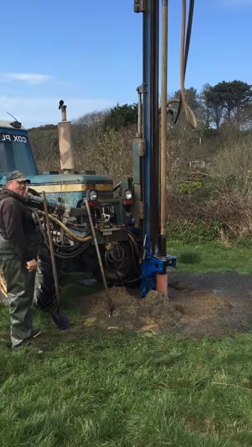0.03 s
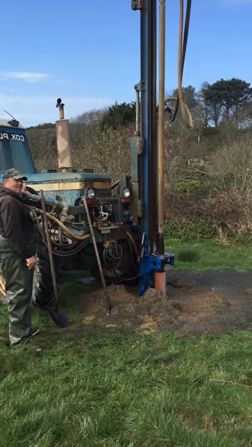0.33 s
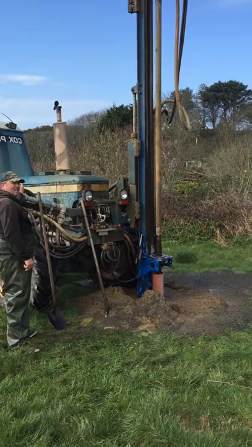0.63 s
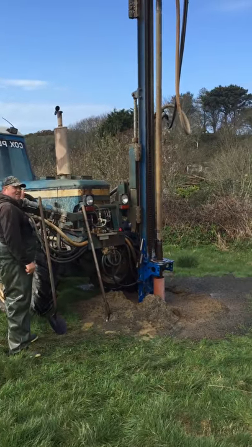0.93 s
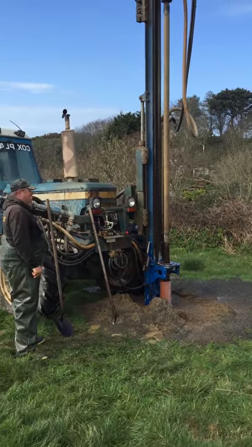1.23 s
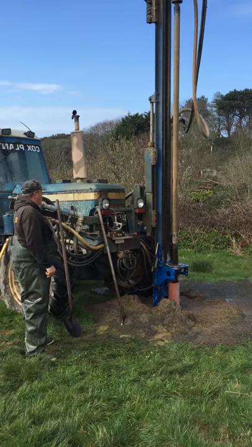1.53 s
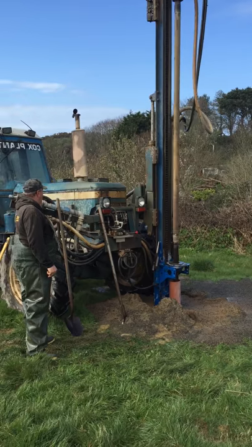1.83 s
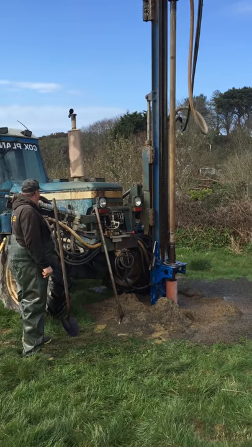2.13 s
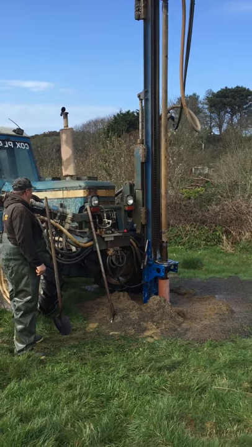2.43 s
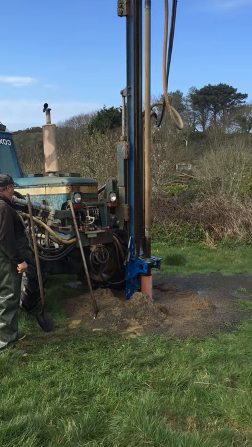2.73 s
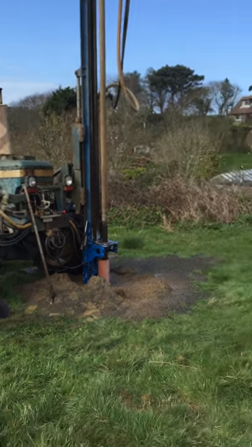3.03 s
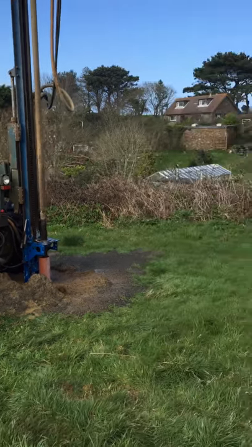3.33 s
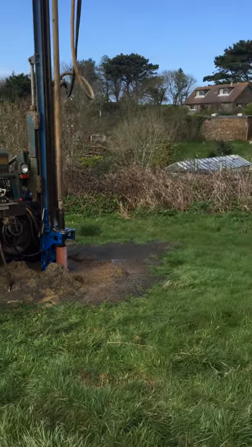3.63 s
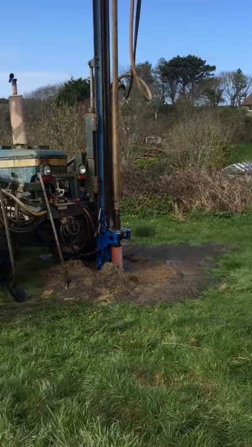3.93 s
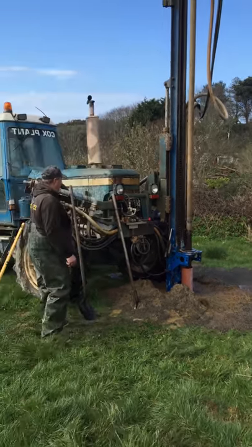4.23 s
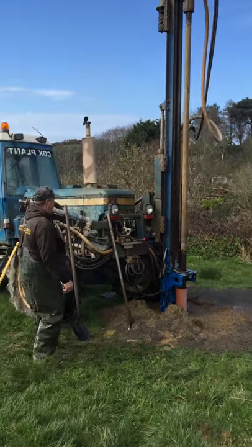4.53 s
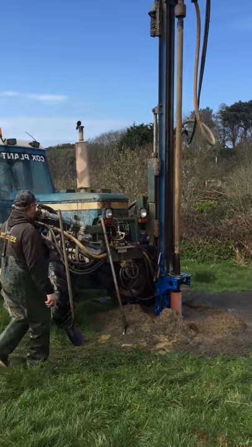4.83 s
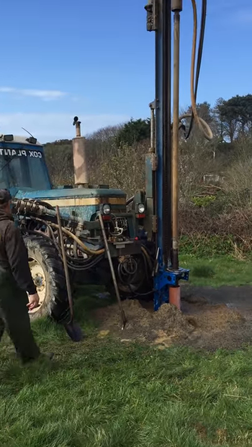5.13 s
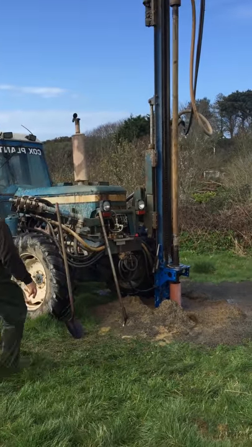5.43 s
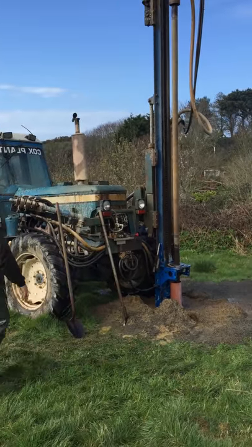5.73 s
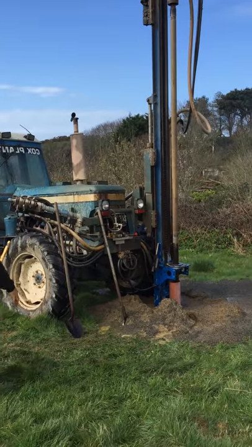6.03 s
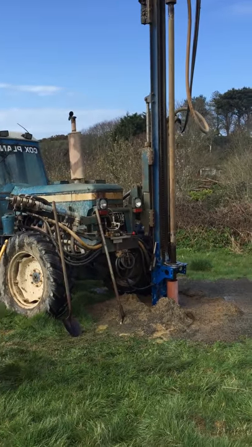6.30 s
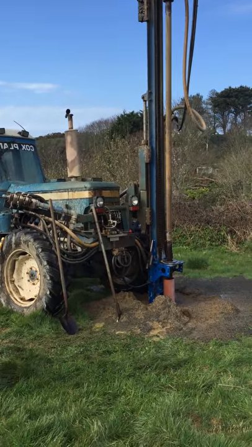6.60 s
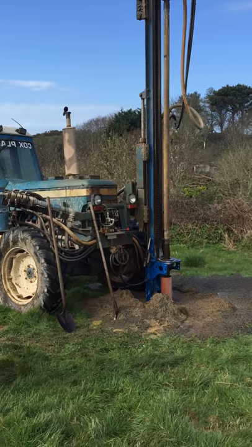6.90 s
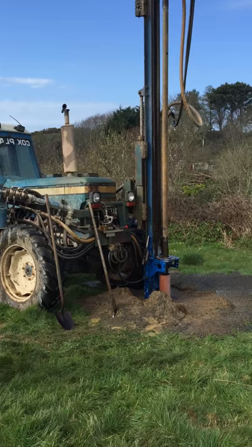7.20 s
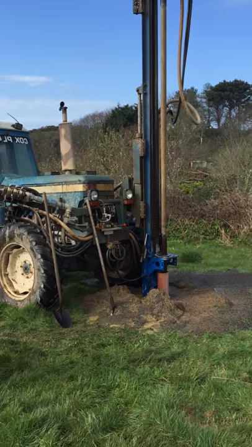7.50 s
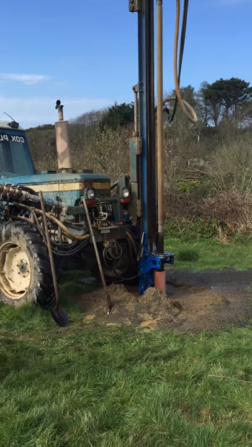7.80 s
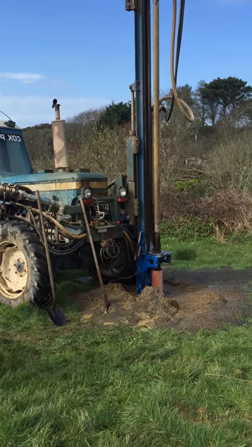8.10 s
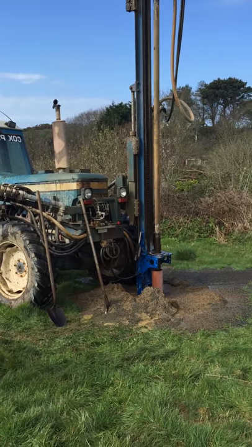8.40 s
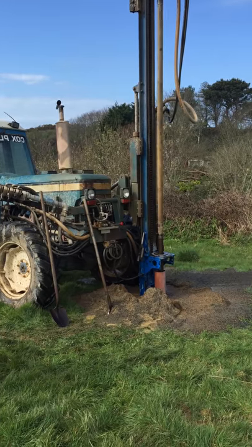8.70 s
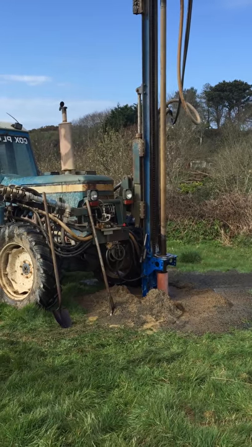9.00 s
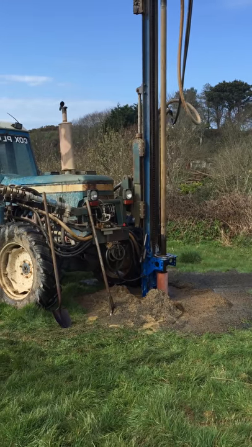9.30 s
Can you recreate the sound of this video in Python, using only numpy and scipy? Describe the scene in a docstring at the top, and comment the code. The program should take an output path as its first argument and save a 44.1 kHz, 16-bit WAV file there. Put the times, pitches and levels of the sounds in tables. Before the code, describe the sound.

A tractor's diesel engine runs loud and steady in an open field, droning, chugging and clattering as it drives a drilling rig. Hydraulic hiss and a thin, wavering ring of turning steel continue above it. The drill rod grinds and squeals briefly at the start, then again harder about a second and a half in. The engine carries on with occasional knocks and faint clanks, without echo.

```python
"""Diesel tractor driving a drill

A six-cylinder diesel runs steadily in an open field. Periodic firing makes the exhaust drone and
chug, and its impacts make the block and panels clatter. Turbulent oil hisses in the hydraulics.
Friction keeps the drill steel ringing; twice the rod grinds in its guide and squeals briefly."""
import sys
import numpy as np
from scipy import signal
from scipy.fft import rfft, irfft, next_fast_len
from scipy.io import wavfile
from scipy.ndimage import uniform_filter1d

SR = 44100
rng = np.random.default_rng(int(sys.argv[2]) if len(sys.argv) > 2 else 0)


def inscribe(sig):
    """Save sig as 16-bit PCM at rate SR to the path in sys.argv[1].

    A 1-D sig is mono; a 2-D sig holds one channel per row.
    Samples are clipped to [-1, 1] before scaling.
    """
    pcm = np.round(np.clip(np.atleast_2d(sig).T, -1, 1) * 32767)
    wavfile.write(sys.argv[1], SR, pcm.astype(np.int16))


N = 412335
T = np.arange(N) / SR
CYLINDERS = 6


# lines of exhaust, crank and gears: (order [multiple of the cycle rate], rms level [dB])
ENGINE_ORDERS = [(6, -32.5), (10, -41), (12, -26.3), (20, -43), (50, -47), (63, -49), (69, -51), (78, -48),
                 (116, -45), (120, -48)]
# hum at the firing rate: (time [s], gain [dB])
HUM_GAIN = [(0, 0), (3.9, -2), (4.5, 2), (5.4, -3), (8.9, -3.5), (9.35, 1)]
# swells and sags of the exhaust: (centre time [s], length [s], gain [dB])
EXHAUST_THROBS = [(1.13, .07, 4.5), (1.39, .07, -6), (2.19, .05, -8), (2.4, .25, 2.5), (2.56, .06, -6),
                  (3.335, .07, 5), (3.46, .06, -9), (3.51, .09, 5), (3.57, .07, -8), (3.62, .07, 5),
                  (3.7, .12, -6), (3.79, .06, 4), (3.865, .1, -8), (4, .14, 5), (4.15, .06, -10),
                  (5.34, .06, -7), (5.45, .14, 4), (5.6, .1, -10), (5.72, .09, -10), (6.22, .07, -9),
                  (6.36, .06, 4), (6.48, .16, -4), (7, .09, -6), (7.79, .06, -7), (9.11, .07, 4.5)]
def drone(cycle):
    """Harmonic series: periodic firing gives lines at whole multiples of the engine cycle rate."""
    hum_db, = curves(HUM_GAIN)
    throb_db = swells(EXHAUST_THROBS) + 1.3 * walk(16)
    lope_db = -2.2 * np.cos(2 * np.pi * (cycle - 0.22))  # unequal cylinders: one sag a cycle
    out = 0
    for order, db in ENGINE_ORDERS:
        turns = order * cycle
        if order == CYLINDERS:
            db = db + hum_db + 2.0 * walk(18)
        elif order == 2 * CYLINDERS:
            db = db + throb_db + lope_db
        else:  # weak lines waver in level and phase
            db = db + 3.8 * walk(9)
            turns = turns + rng.random() + 0.082 * walk(20)
        out = out - undb(db) * np.cos(2 * np.pi * turns)
    return np.sqrt(2) * out


# cylinders in firing order: (pulse strength [ratio])
CYLINDER_PULSES = [0.48, 0.18, 0, 0.92, 0.15, 0.45]
# the hardest chugs: (time [s], peak level [dB])
THUDS = [(1.371, -20), (1.470, -18), (1.667, -19), (4.372, -20), (4.864, -17), (4.963, -18), (7.722, -20),
         (7.820, -15), (7.869, -17), (7.967, -17), (8.164, -20)]
def chugs(cycle):
    """Pressure pulses: unequal cylinders give an uneven beat, with occasional sharp thuds."""
    width, thud_s = 0.095, 0.0011  # width is a fraction of the firing interval
    count, position = np.divmod(cycle * CYLINDERS + 0.5, 1)
    count = count.astype(int)
    scatter_db = 3.2 * np.minimum(rng.standard_normal(SR), 2)[count]
    depth = np.array(CYLINDER_PULSES)[count % CYLINDERS] * undb(scatter_db)
    beat = undb(-21.5) * (depth - depth.mean()) * dip((position - 0.5) / width)
    return beat + sum(undb(db) * dip((T - s) / thud_s) for s, db in THUDS)


# noise of the stack: (frequency [Hz], gain [dB])
EXHAUST_SPECTRUM = [(20, -25), (32, -16), (46, -13), (62, -2.5), (85, -7), (115, -2), (152, 1), (175, -2.5),
                    (192, -4.5), (250, -8), (330, -10.5), (390, -12), (440, -13.5), (520, -15.5),
                    (1000, -56.5)]
def exhaust(cycle):
    """Pulsating jet: each firing drives a turbulent puff from the stack, following the throb."""
    puffs = firings(cycle, [1.8, 0.28, -0.13, 0.64, -0.66, -0.13], scatter_db=0.5, decay=1.0)
    throb = undb(swells(EXHAUST_THROBS) / 2)
    return colour(rattle(cycle, repeat=0.1) * (1.3 + puffs) * throb, EXHAUST_SPECTRUM)


# response of the block: (frequency [Hz], gain [dB])
BLOCK_SPECTRUM = [(250, -30), (455, -15.5), (500, -0.5), (548, -2), (580, -6), (630, -1), (760, -2.5),
                  (900, -6.5), (1050, -5.5), (1290, -4.5), (1520, -9), (2000, -9.5), (2850, -12),
                  (3300, -11), (5000, -18.5), (10000, -33.5)]
# bonnet resonances: (frequency [Hz], bandwidth [Hz], gain [dB])
BONNET_MODES = [(635, 70, 3.2), (710, 55, 2.8), (762, 30, -2.5), (797, 35, 4.5), (912, 25, 3.5),
                (965, 40, 3.8), (1065, 70, -3), (1155, 60, 3.5), (1245, 60, 2), (1400, 80, 2),
                (1540, 40, -3.5), (1660, 100, 3.3), (1785, 55, 5.8), (2350, 110, 2.5)]
def clatter(cycle):
    """Impact excitation: combustion knock and valve gear ring the block and bonnet panels."""
    knocks = firings(cycle, [3.0, -3.0, -0.5, 3.0, -2.0, 2.0], scatter_db=4.5, decay=0.34)
    force = rattle(cycle, repeat=0.23) * (4.2 + knocks)
    return colour(force, BLOCK_SPECTRUM, BONNET_MODES, ripple_db=0.6)


# the hardest firings: (peak time [s], level [dB])
DIESEL_KNOCKS = [(.156, -19.5), (1.368, -19.5), (5.707, -21), (5.839, -20), (7.405, -20), (7.786, -20),
                 (8.263, -21), (8.396, -17.5), (9.112, -18.5)]
def hard_knocks():
    """Transient response: a single hard firing briefly excites the block and bonnet."""
    rise_s = 0.002
    envelope = sum(undb(db) * burst(s - rise_s, rise_s) for s, db in DIESEL_KNOCKS)
    return envelope * colour(rng.standard_normal(N), BLOCK_SPECTRUM, BONNET_MODES)


# flow noise of the oil: (frequency [Hz], gain [dB])
OIL_SPECTRUM = [(1500, -19.5), (2500, 7), (2850, 6), (3500, 2), (4300, -3.5), (4900, -6), (5700, 3),
                (6700, 4), (7600, -1), (8400, -1), (9200, -9.5), (10200, 0.5), (10900, -27), (11600, -30),
                (12300, 7), (13400, -6), (13900, -23)]
# pipe resonances: (frequency [Hz], bandwidth [Hz], gain [dB])
PIPE_MODES = [(6740, 81, 2.9), (7800, 210, 1), (9840, 180, 5.6)]
def hydraulics(cycle):
    """Turbulent pipe flow: oil hisses in slight surges, a little different to left and right."""
    pump_hz = 3.0
    flow = undb(0.18 * np.sin(2 * np.pi * pump_hz * T) + 0.5 * walk(45))
    mid = colour(rattle(cycle, repeat=0.097) * flow, OIL_SPECTRUM, PIPE_MODES, ripple_db=1.7)
    side = colour(rng.standard_normal(N), OIL_SPECTRUM, PIPE_MODES)
    return mid + undb(-32) * side * np.array([[1], [-1]])


# valve block, screened by the driller until he steps aside: (time [s], level [dB])
SIZZLE_LEVEL = [(0, -36), (1.3, -34.5), (2.2, -39.5), (4.2, -37), (4.9, -39), (5.4, -32.5), (7.5, -30.5),
                (9.35, -31.5)]
# its response: (frequency [Hz], gain [dB])
SIZZLE_SPECTRUM = [(900, -28), (1600, -5), (3000, -4), (5000, 0), (7000, 2.5), (9000, -2), (11000, 5.5),
                   (13600, -46)]
# its resonances: (frequency [Hz], bandwidth [Hz], gain [dB])
SIZZLE_MODES = [(2950, 110, 12), (3435, 95, 18.5), (4330, 90, 9), (4680, 120, 11.5), (5313, 60, 10),
                (6700, 120, 8), (7020, 90, 15), (8270, 170, 9), (9830, 170, 10), (10950, 400, 3)]
def valves(cycle):
    """Broadband excitation: the valve block and its fittings sizzle in many high modes."""
    level_db, = curves(SIZZLE_LEVEL)
    flutter = undb(1.1 * walk(12) + 1.5 * walk(90))
    force = rattle(cycle, repeat=0.26) * flutter
    return undb(level_db) * colour(force, SIZZLE_SPECTRUM, SIZZLE_MODES, ripple_db=0.4)


# tones of the drill steel: (time [s], frequency [Hz], level [dB])
UPPER_RING = [(0, 3115, -33.5), (.6, 3115, -38), (1.2, 3115, -38), (1.55, 3130, -32.5), (2.3, 3135, -36),
              (3.1, 3140, -42), (4.2, 3165, -38.5), (5.8, 3158, -37.5), (6.3, 3165, -41), (7.15, 3168, -37),
              (9.35, 3168, -37)]
LOWER_RING = [(0, 3060, -37), (1.1, 3060, -45), (1.55, 3080, -35), (3, 3075, -42), (3.8, 3080, -39.5),
              (5.2, 3065, -47), (6.3, 3045, -37), (7.2, 3035, -40), (8.4, 3015, -40), (9.35, 3010, -35.5)]
UPPER_WHINE = [(0, 4555, -40), (.55, 4560, -40), (.9, 4560, -47), (1.3, 4560, -42), (2.1, 4555, -39.5),
               (2.8, 4550, -41.5), (3.4, 4570, -46.5), (4.4, 4585, -47), (5.5, 4595, -46), (6.2, 4600, -56)]
LOWER_WHINE = [(3.1, 4470, -60), (3.7, 4465, -46), (5.1, 4455, -44.5), (5.7, 4435, -51), (7.1, 4425, -45),
               (9.35, 4425, -49)]
ROD_WHISTLE = [(2.03, 8520, -75), (2.18, 8480, -40.5), (2.45, 8150, -51), (3.2, 7900, -47.5),
               (3.8, 7880, -75)]
# blows on the steel: (time [s], level [dB])
STEEL_BLOWS = [(.03, -34), (.81, -30), (4.19, -30), (7.145, -27), (8.52, -28), (9.19, -31)]
def drill_steel():
    """Modal vibration: the turning steel sings in five narrow bands; blows boost the upper ring."""
    flare_db, waver_hz = 2.6, 7
    blow_power = sum((undb(db) * burst(s, rise_s=0.014)) ** 2 for s, db in STEEL_BLOWS)
    tones = [(UPPER_RING, 30, blow_power), (LOWER_RING, 30, 0),
             (UPPER_WHINE, 22, 0), (LOWER_WHINE, 22, 0), (ROD_WHISTLE, 22, 0)]
    out = 0
    for table, width_hz, struck_power in tones:
        hz, db = curves(table)
        rubbed = undb(db - flare_db / 4 + flare_db * walk(34))
        amplitude = np.sqrt(rubbed ** 2 + struck_power)
        out = out + amplitude * rubbed_mode(hz + waver_hz * walk(12), width_hz)
    return out


# rod rubbing in its guide: (time [s], level [dB])
GRIND_LEVEL = [(0, -26.5), (.13, -30), (.24, -42), (1.1, -37), (1.36, -31.5), (1.48, -25.3), (1.6, -24.8),
               (1.67, -26.8), (1.8, -25.5), (2, -29.5), (2.5, -30.5), (2.85, -33.5), (3.3, -42),
               (9.35, -49)]
# its friction noise: (frequency [Hz], gain [dB])
GRIND_SPECTRUM = [(1000, -27.5), (1600, -9), (2200, 4.5), (2800, -4), (3400, -3.5), (4200, -8),
                  (6000, -8.5), (8500, -13.5), (14000, -18)]
def grinding():
    """Stick-slip friction: the rod moves through its guide in quick, uneven slips."""
    level_db, = curves(GRIND_LEVEL)
    slips = undb(0.7 * walk(60) + 1.1 * walk(400))
    modes = [(3060, 93, 2.1), (3210, 70, 3.0), (3610, 140, 3.6)]
    return undb(level_db) * colour(rng.standard_normal(N) * slips, GRIND_SPECTRUM, modes, ripple_db=3.1)


# the hardest scrape: (frequency [Hz], gain [dB])
SCRAPE_SPECTRUM = [(1200, -23), (2000, -4), (3700, 2), (4300, -1), (6000, -9), (9000, -25)]
# rod resonances: (frequency [Hz], bandwidth [Hz], gain [dB])
ROD_MODES = [(2580, 80, 8), (3465, 130, 12), (4135, 80, 9)]
def scrape():
    """Frictional excitation: the rod bites hard into its guide once, ringing the steel."""
    swell = np.sqrt(arch(start=1.42, length=0.26))
    slips = undb(2.5 * walk(150))
    return undb(-29.5) * swell * colour(rng.standard_normal(N) * slips, SCRAPE_SPECTRUM, ROD_MODES)


# squeals of the rod: (start [s], length [s], frequency [Hz], level [dB])
ROD_SQUEALS = [(0, 0.23, 6170, -35), (.06, 0.098, 5233, -37), (1.55, 0.065, 5265, -34),
               (1.697, 0.13, 5190, -27)]
def squeals():
    """Self-excited oscillation: the sticking steel briefly locks onto one mode."""
    out = np.zeros(N)
    for start, length, hz, db in ROD_SQUEALS:
        swell = arch(start, length) ** 1.3 * undb(1.7 * walk(220))
        turns = np.cumsum(hz * (1 + 0.0023 * walk(130))) / SR
        out += undb(db) * swell * np.sqrt(2) * np.sin(2 * np.pi * turns)
    return out


# chassis boom and silencer growl: (time [s], level [dB])
CHASSIS_LEVEL = [(0, -44), (1.2, -40), (2.9, -44), (3.3, -37), (4.05, -31.5), (4.3, -49), (5.6, -46),
                 (9.35, -36)]
SILENCER_LEVEL = [(0, -55), (2.6, -43), (3.3, -35.5), (5.2, -36.5), (6.4, -31), (7.3, -35), (8.3, -33.5),
                  (9.35, -34.5)]
# their responses: (frequency [Hz], gain [dB])
CHASSIS_SPECTRUM = [(190, -31.5), (250, 0.5), (310, -3), (390, -1), (450, -1.5), (540, -30)]
SILENCER_SPECTRUM = [(170, -30), (225, -2.5), (255, -4), (290, -5), (365, -9.5), (440, -30.5)]
def chassis_and_silencer(cycle):
    """Forced vibration: the firings shake a boom from the chassis and a growl from the silencer."""
    shakes = firings(cycle, [1.3, -2, 0.5, 2.3, -2.4, 0.66], scatter_db=1.5, decay=0.69)
    boom_db, = curves(CHASSIS_LEVEL)
    growl_db, = curves(SILENCER_LEVEL)
    boom = colour(rattle(cycle, repeat=0.14) * shakes, CHASSIS_SPECTRUM)
    growl = colour(rattle(cycle, repeat=0.36) * shakes, SILENCER_SPECTRUM)
    return undb(boom_db) * boom + undb(growl_db) * growl


# rasp of the side panels: (time [s], level [dB])
PANEL_LEVEL = [(0, -48), (3, -37), (4.2, -36), (6, -38), (9.35, -35.5)]
# their response: (frequency [Hz], gain [dB])
PANEL_SPECTRUM = [(900, -20), (1250, -5), (1700, -2), (2100, -30)]
# their resonances: (frequency [Hz], bandwidth [Hz], gain [dB])
PANEL_MODES = [(1280, 50, 6), (1380, 70, 10), (1450, 50, 6), (1585, 45, 10), (1655, 65, 12)]
def side_panels(cycle):
    """Plate resonance: thin side panels buzz with each firing."""
    level_db, = curves(PANEL_LEVEL)
    blows = firings(cycle, [4, -3, 1, 2, 1, -4], scatter_db=3, decay=0.35)
    return undb(level_db) * colour(rattle(cycle, repeat=0.2) * blows, PANEL_SPECTRUM, PANEL_MODES)


# loose fittings: (start [s], frequency [Hz], level [dB])
FITTING_CLANKS = [(3.266, 2370, -31), (3.542, 823, -27), (6.683, 780, -30)]
def clanks():
    """Single-mode resonance: a loose fitting rattles briefly in one narrow band."""
    width_hz = 56
    out = np.zeros(N)
    for start, hz, db in FITTING_CLANKS:
        ring = signal.lfilter(*signal.iirpeak(hz, hz / width_hz, fs=SR), rng.standard_normal(N))
        out += undb(db) * burst(start, rise_s=0.026) * unit(ring)
    return out


def firings(cycle, cylinder_db, scatter_db, decay):
    """Exponential decay after each unequal firing; the time constant is in firing intervals."""
    count, since = np.divmod(cycle * CYLINDERS, 1)
    count = count.astype(int)
    blow_db = np.array(cylinder_db)[count % CYLINDERS] + scatter_db * rng.standard_normal(SR)[count]
    return unit(undb(blow_db) * np.exp(-since / decay))


def rattle(cycle, repeat):
    """Partly periodic noise: dense contacts, with a share of the power recurring every cycle."""
    cycle_samples = int(N / (cycle[-1] - cycle[0]))
    pattern = rng.standard_normal(SR)
    periodic = unit(np.interp(cycle % 1 * cycle_samples, np.arange(SR), pattern))
    return np.sqrt(repeat) * periodic + np.sqrt(1 - repeat) * rng.standard_normal(N)


def rubbed_mode(hz, width_hz):
    """Narrowband noise: a restless tone around a moving pitch, fairly even in strength."""
    noise = rng.standard_normal(N) + 1j * rng.standard_normal(N)
    envelope = signal.sosfilt(signal.butter(2, width_hz, fs=SR, output="sos"), noise)
    evened = envelope / np.sqrt(np.abs(envelope) + 1e-9)
    return unit(np.real(evened * np.exp(2j * np.pi * np.cumsum(hz) / SR)))


def colour(x, spectrum, modes=(), ripple_db=0):
    """Source-filter model: a body's broad response, main modes and ripple of lesser ones; rms 1."""
    size = next_fast_len(N + SR // 4, real=True)
    f = np.maximum(np.fft.rfftfreq(size, 1 / SR), 1)
    hz, db = np.transpose(spectrum)
    gain_db = np.interp(np.log(f), np.log(hz), db)
    for centre_hz, width_hz, lift_db in modes:
        gain_db += lift_db / (1 + (2 * (f - centre_hz) / width_hz) ** 2)
    ripple_hz = np.arange(0, SR / 2, 45)
    gain_db += ripple_db * np.interp(f, ripple_hz, rng.standard_normal(len(ripple_hz)))
    # minimum phase: the body rings after a blow
    cepstrum = irfft(np.log(undb(gain_db)), size)
    cepstrum[1:size // 2] *= 2
    cepstrum[size // 2 + 1:] = 0
    return unit(irfft(rfft(x, size) * np.exp(rfft(cepstrum)), size)[:N])


def dip(x):
    """Rarefaction pulse with a small overshoot on either side."""
    return -(1 - x ** 2) * np.exp(-np.minimum(x ** 2, 200) / 2)


def burst(start, rise_s):
    """Critically damped envelope, peaking at 1 one rise time after its start."""
    age = np.maximum(T - start, 0) / rise_s
    return age * np.exp(1 - np.minimum(age, 20))


def arch(start, length):
    """Half-sine envelope, timed in seconds."""
    return np.abs(np.sin(np.pi * np.clip((T - start) / length, 0, 1)))


def swells(table):
    """Superposed raised-cosine bumps in dB."""
    return sum(db * np.cos(np.pi * np.clip((T - s) / length, -0.5, 0.5)) ** 2 for s, length, db in table)


def walk(rate_hz):
    """Low-pass noise: a smooth random wander of rms 1."""
    hold = int(SR / rate_hz)
    steps = np.repeat(rng.standard_normal(N // hold + 1), hold)
    return unit(uniform_filter1d(uniform_filter1d(steps, hold), hold)[:N])


def curves(table):
    """Linear interpolation of each column over time."""
    times, *columns = np.transpose(table)
    return [np.interp(T, times, column) for column in columns]


def undb(db):
    """Decibels to amplitude ratio."""
    return 10 ** (np.asarray(db) / 20)


def unit(x):
    """Normalisation to rms 1."""
    return x / np.sqrt(np.mean(x ** 2))


# engine speed: (time [s], firing rate [Hz])
FIRING_RATE = [(0.0, 61.05), (1.25, 61.14), (1.6, 60.97), (2.55, 60.61), (2.95, 61.7), (3.65, 60.83),
               (4.5, 61.1), (5.65, 60.3), (6.05, 61.87), (6.65, 60.41), (7.7, 61.04), (8.7, 60.84),
               (9.35, 61.85)]
# main noise levels: (time [s], exhaust [dB], clatter [dB], hydraulics [dB])
NOISE_LEVELS = [(0, -27.5, -23.5, -31.5), (1.3, -26, -24.5, -29.5), (2, -29, -25, -29.5),
                (3, -27, -24.5, -32), (3.9, -27.5, -25.5, -32.5), (4.8, -27, -24, -31.5),
                (5.6, -29, -24.5, -29.5), (6.5, -28, -23.5, -30), (8, -28, -24, -30),
                (9.35, -28.5, -23.5, -29.5)]
def scene():
    """Free-field superposition: the sources add without echo, and the crank times the engine."""
    firing_hz, = curves(FIRING_RATE)
    firing_count = 0.2 + np.cumsum(firing_hz * (1 + 0.000702 * walk(12))) / SR
    cycle = firing_count / CYLINDERS
    rumble_db, clatter_db, hiss_db = curves(NOISE_LEVELS)
    stack = drone(cycle) + chugs(cycle) + undb(rumble_db) * exhaust(cycle)
    block = undb(clatter_db) * clatter(cycle) + hard_knocks()
    bodywork = side_panels(cycle) + chassis_and_silencer(cycle)
    oil = undb(hiss_db) * hydraulics(cycle) + valves(cycle)
    drill = drill_steel() + grinding() + scrape() + squeals() + clanks()
    return stack + block + bodywork + oil + drill


def record(dry):
    """Band limiting: a steep low-pass filter removes the highest treble."""
    cutoff_hz = 13900
    return signal.sosfilt(signal.ellip(8, 0.2, 70, cutoff_hz, fs=SR, output="sos"), dry)


dry = scene()
out = record(dry)
inscribe(out)
```